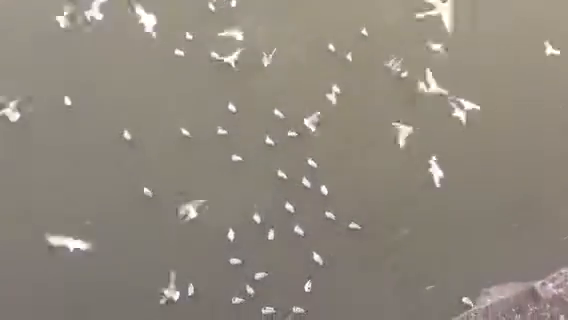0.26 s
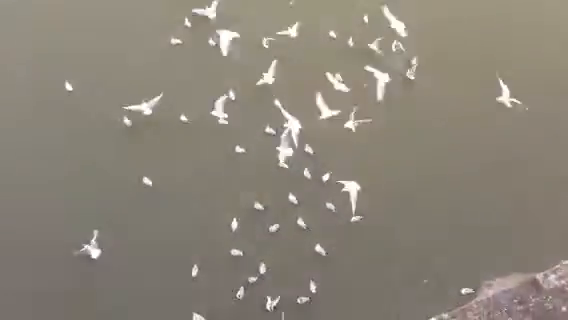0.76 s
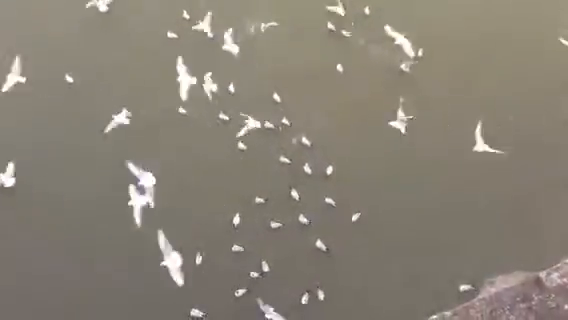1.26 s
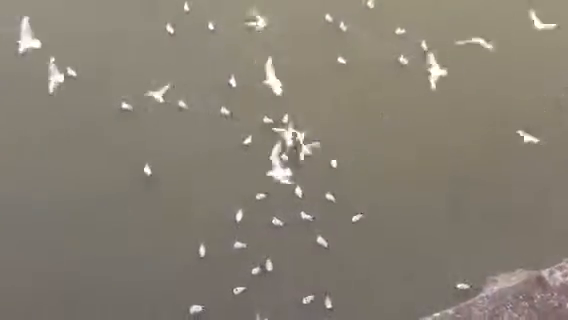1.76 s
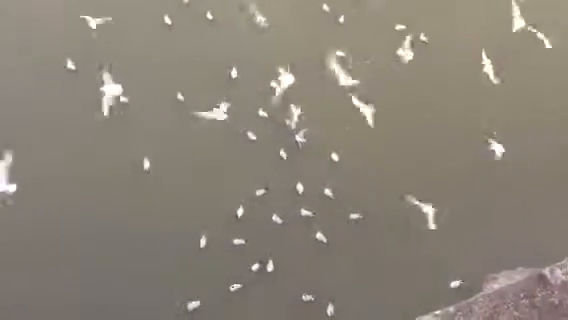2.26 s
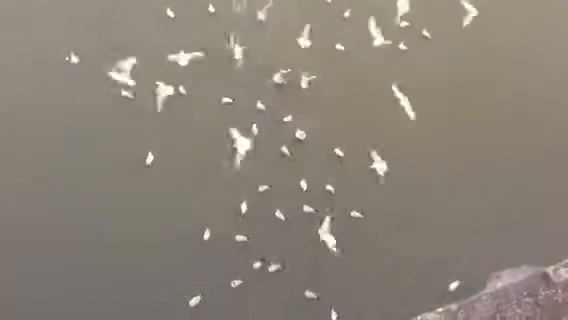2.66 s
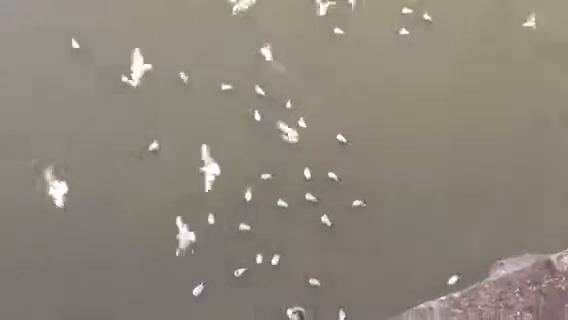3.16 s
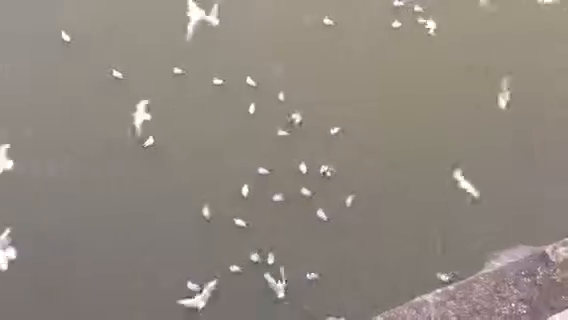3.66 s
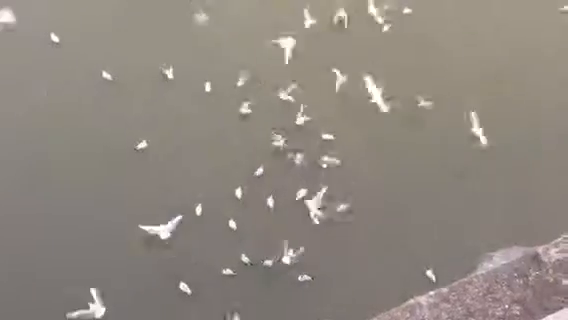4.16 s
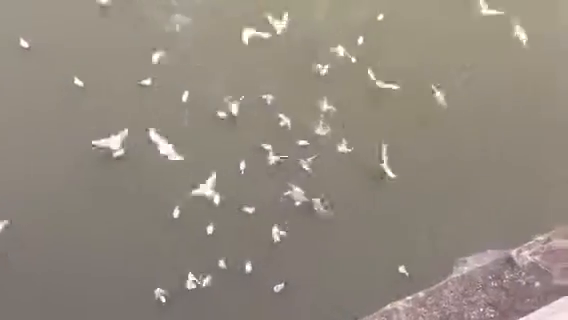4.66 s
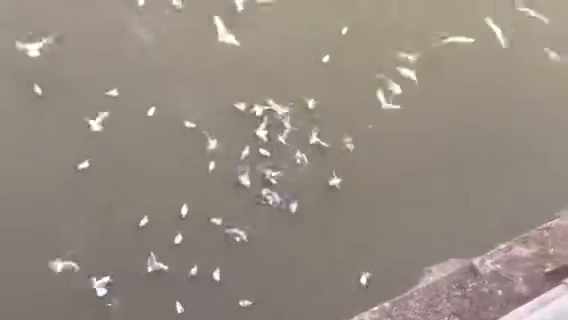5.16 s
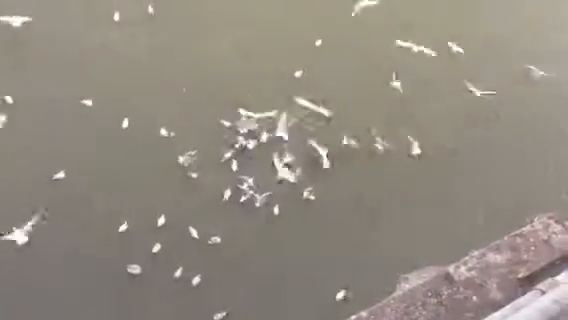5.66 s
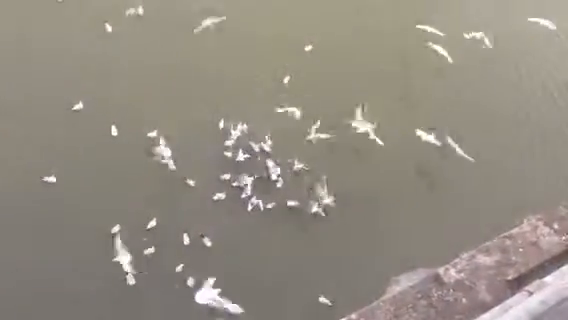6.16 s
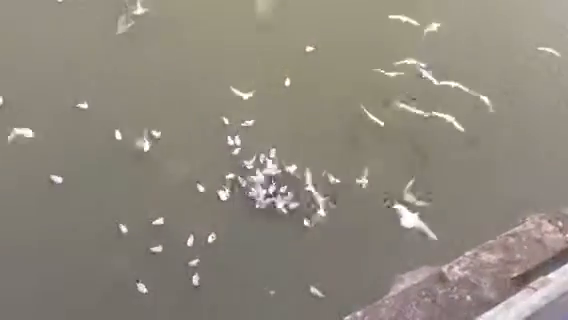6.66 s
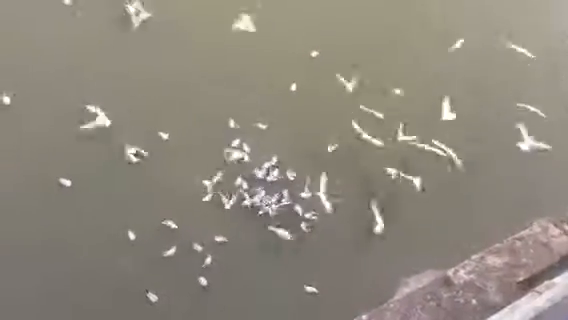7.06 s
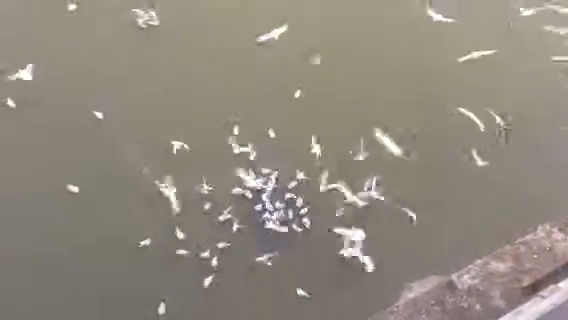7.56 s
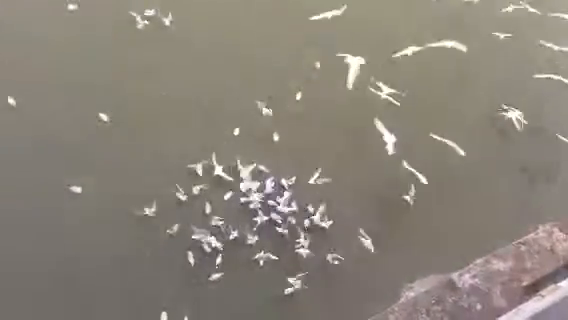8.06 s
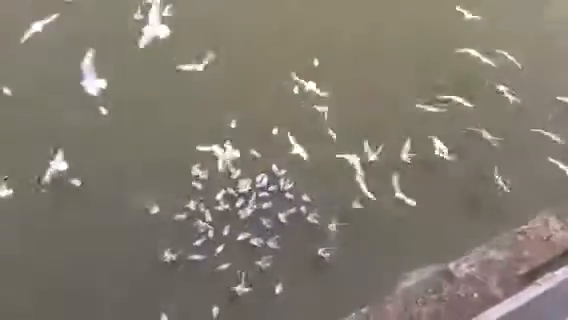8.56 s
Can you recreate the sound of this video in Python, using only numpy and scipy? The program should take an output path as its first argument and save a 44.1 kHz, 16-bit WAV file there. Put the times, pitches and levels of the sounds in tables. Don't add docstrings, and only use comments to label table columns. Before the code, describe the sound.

Outdoors above a river, a few quiet, short raspy gull calls and dry clacks sound over soft water hiss and low town rumble. After a thin, distant stretch, cries return near four seconds and multiply, near and far, into a dense squabbling clamour with hoarse longer calls and growing wing splash. A small microphone catches brief wind puffs and faint echoes off wall and banks.

```python
import sys
import numpy as np
from scipy import signal
from scipy.fft import rfft, irfft
from scipy.io import wavfile
from scipy.ndimage import uniform_filter1d

SR = 44100
rng = np.random.default_rng(int(sys.argv[2]) if len(sys.argv) > 2 else 0)


def log_audio(samples):
    frames = np.atleast_2d(samples).T
    limited = np.clip(frames, -1, 1)
    pcm = np.round(limited * 32767).astype(np.int16)
    wavfile.write(sys.argv[1], SR, pcm)


def invert_db(x):
    u = np.asarray(x, float) / 20
    return 10 ** u


N = 388080

# (fast pitch jitter/share, slow pitch wander/share, breath/0-1,
#                      half-pitch pulses/dB, pitch rise in each rattle beat/share)
CLEAR_VOICE = (.015, .016, .17, -12, .04)
HOARSE_VOICE = (.026, .04, .42, -7, .06)
SCREECH_VOICE = (.04, .03, .65, -6, .06)


def evened(x):
    return x / np.sqrt(np.mean(x ** 2) + 1e-20)


def add(mix, s, sound):
    part = mix[max(round(s * SR), 0):][:len(sound)]
    part += sound[:len(part)]


def read(points, hz, axis=1):
    columns = np.transpose(points)
    return np.interp(np.log(hz + 1), np.log(columns[0] + 1), columns[axis])


def cry(row, voice, glide, chance):
    # f/Hz, level/dB, share of the beak opening
    head = [(477, -29, 0), (1000, -18, 0), (1634, 3.5, 0.078), (2600, 2.5, 0.11), (3950, 2, 0.42),
            (5790, -2, 0.61), (7910, -12, 0.52), (11600, -21.5, 0.27), (15600, -28, 0)]
    rattle_hz, rattle_depth = 76.18, .68
    throat_width_hz, throat_db = 356, 6.5
    start, length, db, pitch_hz, throat_hz, beak_db = row
    jitter, wander, breath, half_db, sweep = voice
    progress = np.linspace(0, 1, min(int(length * SR), chance.shape[1]))
    wobble, drift, air = chance[:, :len(progress)]
    effort = np.clip(np.sin(np.pi * progress ** .8) * 1.3, 0, 1) ** 1.3
    gape = abs(np.sin(np.pi * progress ** .85)) ** 1.5

    def colour(hz, beak_db):
        throat = throat_db * np.exp(-.5 * ((hz - throat_hz) / throat_width_hz) ** 2)
        return invert_db(read(head, hz) + beak_db * read(head, hz, axis=2) + throat)

    rate = rattle_hz * (1 + .15 * air[0] + .3 * evened(uniform_filter1d(drift, size=500)))
    beat, rattle = np.divmod(np.cumsum(rate) / SR + air[1] % 1, 1)
    beat = beat.astype(int)

    slow = evened(uniform_filter1d(uniform_filter1d(wobble, size=900), size=600))
    arch = 0.0656 * min(0.0903 / length, 1) * (np.sin(np.pi * progress) - .8)
    bend = glide * (progress - .5) + arch + wander * slow + jitter * wobble[beat]
    quick = jitter * evened(uniform_filter1d(wobble, size=80))
    hz = pitch_hz * (1 + bend + sweep * (rattle - .5) + quick)

    orders = np.r_[1:17, 1.5:7][:, None]
    turns = 14 * length * progress[::32] * drift[:len(orders), None]
    swell_db = 6.05 * np.sin(2 * np.pi * (air[:len(orders), None] + turns))
    order_db = -1.5 * np.maximum(orders - 6, 0) + half_db * (orders % 1 > 0) - 7.2 * (orders == 1)
    strength = colour(orders * hz[::32], beak_db - 16 * (1 - gape[::32])) * invert_db(order_db + swell_db)
    strength = strength.repeat(32, axis=1)[:, :len(hz)]
    phase = 2 * np.pi * np.cumsum(hz) / SR + orders * air[2]
    tone = (strength * np.cos(orders * phase)).sum(0)

    bins_hz = np.fft.rfftfreq(len(hz), 1 / SR)
    shut = irfft(rfft(air) * colour(bins_hz, beak_db - 16), len(hz))
    wide = irfft(rfft(air) * colour(bins_hz, beak_db + 2.5), len(hz))
    hiss = shut + gape ** 2 * (wide - shut)

    chop = 1 - rattle_depth * np.cos(np.pi * rattle) ** 2
    chop *= uniform_filter1d(invert_db(0.4 * drift[beat]), size=100)
    voiced = np.sqrt(1 - breath) * evened(tone) + np.sqrt(breath) * effort * evened(hiss)
    return start, invert_db(db) * evened(chop * voiced) * effort


def near_gulls():
    # t/s, length/s, level/dB, pitch/Hz, beak opening as treble/dB
    deep_cries = [(.002, 0.3, -44.5, 1155, -19), (.082, 0.085, -37, 784, -20),
                  (.197, 0.042, -43.5, 742, -37), (.337, 0.16, -40, 916, -25),
                  (.47, 0.073, -48.5, 754, -21), (.681, 0.18, -47.5, 1065, -9), (.781, 0.07, -40, 840, -25),
                  (.935, 0.084, -46, 1323, -37), (1.399, 0.049, -42, 800, -21),
                  (2.831, 0.067, -45.5, 740, -33), (3.595, 0.06, -42, 839, -18),
                  (3.844, 0.043, -35, 1134, 14), (3.859, 0.085, -32, 1037, 13),
                  (5.226, 0.12, -36, 1038, -6), (5.415, 0.13, -32.5, 1062, -4),
                  (5.475, 0.13, -33, 959, -28), (5.685, 0.047, -28, 1043, 14),
                  (6.109, 0.062, -29.5, 1109, 6), (7.4, 0.14, -35, 938, 26), (7.81, 0.3, -33.5, 1110, 46)]
    low_cries = [(0.41, 0.078, -51, 983, -13), (1.712, 0.056, -36.5, 1000, -42),
                 (2.159, 0.055, -40.5, 894, -34), (2.283, 0.049, -49.5, 1032, -32),
                 (3.25, 0.056, -44, 1263, -40), (3.73, 0.056, -36, 1086, -7),
                 (4.058, 0.064, -33.5, 1278, -48), (4.422, 0.13, -34, 1240, -31),
                 (4.692, 0.063, -33, 1263, 6), (4.742, 0.062, -37, 1076, -9),
                 (5.055, 0.0434, -37.5, 903, -19), (5.934, 0.043, -31, 1102, -9),
                 (5.999, 0.086, -31.5, 1209, 11), (6.927, 0.24, -33, 736, 0), (7.111, 0.12, -35, 756, 16),
                 (7.645, 0.074, -31, 990, -14)]
    middle_cries = [(0.329, 0.039, -42.5, 740, -13), (1.855, 0.042, -49, 1250, -28),
                    (0.965, 0.07, -54, 793, -18), (4.359, 0.1, -33, 890, -24),
                    (4.578, 0.26, -39.5, 842, -15), (4.822, 0.19, -33, 897, -24),
                    (4.972, 0.028, -30.5, 947, -34), (5.12, 0.21, -41.5, 918, -23),
                    (5.585, 0.23, -31.5, 924, -2), (6.268, 0.17, -29.5, 1167, 0),
                    (6.468, 0.25, -36, 893, 5), (6.767, 0.22, -33, 928, 8), (7.197, 0.21, -33, 859, 1),
                    (7.55, 0.15, -37.5, 935, -3), (7.715, 0.16, -31.5, 1002, -3),
                    (8.104, 0.21, -30.5, 957, -8), (8.244, 0.2, -31, 918, -9),
                    (8.413, 0.19, -29.5, 940, -3), (8.682, 0.18, -30, 892, 8)]
    nasal_cries = [(1.766, 0.03, -46, 860, -20), (0.914, 0.069, -50, 890, -19),
                   (1.11, 0.094, -40.5, 785, -26), (1.266, 0.049, -49, 896, -13),
                   (1.79, 0.059, -37, 919, -7), (3.849, 0.11, -34.5, 963, -1),
                   (4.003, 0.045, -34, 889, -22), (5.135, 0.046, -34, 924, -33),
                   (5.206, 0.056, -35, 902, -5), (5.355, 0.038, -34.5, 876, -26),
                   (5.645, 0.035, -38, 807, -18), (6.255, 0.14, -27.5, 1053, 13), (7.31, 0.17, -31, 968, 6),
                   (7.815, 0.14, -33.5, 916, -11), (8.1, 0.061, -29, 1096, -5),
                   (8.53, 0.074, -29.5, 905, -11)]
    sharp_cries = [(.352, 0.051, -38.5, 841, -7), (0.555, 0.078, -43, 958, -15),
                   (4.594, 0.051, -42.5, 868, -25), (0.767, 0.043, -39, 1125, -6),
                   (3.513, 0.057, -38, 1240, 11), (4.202, 0.09, -36, 1180, -20),
                   (5.844, 0.14, -31, 1084, 8), (5.899, 0.075, -28.5, 981, -11),
                   (6.069, 0.068, -28.5, 940, -17), (6.096, 0.052, -24, 1156, -9),
                   (6.941, 0.044, -38, 1013, 16), (7.831, 0.036, -33, 1090, -10),
                   (8.039, 0.12, -27, 937, -5), (8.034, 0.067, -29, 1065, -2), (8.198, 0.12, -31, 1072, 24),
                   (8.7, 0.047, -39, 1180, 9)]
    shrill_cries = [(1.369, 0.077, -35, 980, -63), (1.378, 0.042, -40.5, 1012, 2),
                    (3.649, 0.17, -40, 1018, -22), (4.279, 0.047, -34, 1034, -12),
                    (4.42, 0.06, -31.5, 1000, -3), (4.683, 0.066, -31, 1018, -3),
                    (4.8, 0.17, -35, 1308, -7), (4.941, 0.054, -34.5, 742, -22),
                    (5.365, 0.23, -38.5, 973, -7), (5.569, 0.075, -33.5, 870, 22),
                    (5.724, 0.28, -39, 955, 12), (6.045, 0.14, -32.5, 1030, 12),
                    (6.162, 0.062, -32.5, 1148, 7), (6.628, 0.28, -39.5, 936, 3),
                    (7.05, 0.055, -32.5, 1120, 21), (7.182, 0.11, -32, 1000, -21),
                    (7.331, 0.079, -36, 1050, 14), (7.459, 0.15, -34.5, 1077, 19),
                    (7.959, 0.11, -34, 1000, 7), (8.373, 0.15, -32.5, 1100, 3)]
    piercing_cries = [(.546, 0.27, -46.5, 783, -30), (1.136, 0.21, -51.5, 745, -58),
                      (3.44, 0.074, -39, 912, -34), (3.515, 0.073, -50, 1085, -13),
                      (3.675, 0.047, -33.5, 1047, 4), (4.13, 0.12, -30, 1093, -1),
                      (4.2, 0.12, -30, 1069, 9), (6.523, 0.042, -29.5, 1090, 3),
                      (7.291, 0.14, -30.5, 964, 22), (7.842, 0.14, -34, 1125, -30),
                      (8.61, 0.17, -33.5, 932, -14)]
    screeches = [
        (1.682, 0.1, -42, 896, 12),
        (1.859, 0.12, -54.5, 846, -7),
        (3.238, 0.084, -40, 1140, -21),
        (3.425, 0.17, -34.5, 1174, 11),
        (6.711, 0.12, -27, 1095, 8.5),
    ]
    throats_hz = 1590, 2040, 2470, 2720, 3170, 4050, 5560
    sag = -0.03556
    out = np.zeros(N)
    sizes = (deep_cries, low_cries, middle_cries, nasal_cries, sharp_cries, shrill_cries, piercing_cries)
    for rows, throat_hz in zip(sizes, throats_hz):
        chances = rng.standard_normal((len(rows), 3, 10000))
        for (s, length, db, hz, beak_db), chance in zip(rows, chances):
            voice = [np.interp(length, (.125, .19), pair) for pair in zip(CLEAR_VOICE, HOARSE_VOICE)]
            add(out, *cry((s, length, db, hz, throat_hz, beak_db), voice, sag, chance))
    chances = rng.standard_normal((len(screeches), 3, 10000))
    for (s, length, db, hz, beak_db), chance in zip(screeches, chances):
        add(out, *cry((s, length, db, hz, 2700, beak_db), SCREECH_VOICE, sag, chance))
    return out


def yaps():
    # t/s, length/s, level/dB, pitch/Hz, loudest f/Hz
    bright_yaps = [(.348, 0.03, -47, 900, 3500), (.644, 0.012, -41, 867, 2600),
                   (.661, 0.026, -41, 765, 2350), (.696, 0.024, -45.5, 797, 3200),
                   (.929, .018, -41, 874, 2650), (.948, 0.021, -42.5, 780, 2660),
                   (1.158, 0.023, -43.5, 782, 3100), (1.272, 0.028, -48, 895, 2700),
                   (4.698, 0.014, -52, 1030, 4140), (4.716, 0.014, -35, 1314, 2600),
                   (6.602, 0.014, -54, 1110, 4500), (6.618, 0.019, -39, 1123, 4500),
                   (6.822, .014, -37, 1110, 4450), (6.838, .014, -39, 1120, 4450),
                   (4.744, .015, -43, 1000, 4050), (4.817, 0.014, -35.5, 1000, 4000),
                   (4.834, 0.0154, -36, 1000, 4000), (4.862, 0.037, -37, 967, 3880),
                   (4.553, 0.018, -40, 854, 2550), (5.478, 0.032, -39, 1100, 5480),
                   (8.378, 0.029, -38, 1107, 4440), (8.044, .026, -30.5, 1140, 3420),
                   (3.68, 0.014, -36.5, 1076, 4280), (3.695, 0.016, -32.5, 1080, 4300),
                   (5.697, 0.0099, -30, 1066, 5380), (5.716, 0.012, -38, 1060, 5350)]
    mellow_yaps = [(2.555, 0.03, -47.5, 639, 1330), (4.477, 0.014, -45, 1300, 2520),
                   (4.493, 0.013, -31.5, 1258, 2520), (4.76, 0.02, -30.5, 1137, 2220),
                   (4.777, 0.011, -34, 1110, 2210), (4.794, 0.012, -32, 1070, 2120),
                   (4.905, 0.022, -32, 904, 2680), (5.066, 0.015, -36.5, 937, 1870),
                   (5.135, 0.014, -37, 925, 2800), (5.152, 0.012, -40, 920, 2760),
                   (5.168, 0.018, -38, 910, 2750), (5.232, 0.019, -34, 914, 1820),
                   (5.36, .014, -35, 880, 2670), (5.374, .016, -40, 890, 2660),
                   (5.535, 0.034, -37, 916, 1920), (7.214, 0.03, -31, 1000, 4000),
                   (7.41, 0.05, -38, 927, 1900), (7.49, 0.034, -34.5, 934, 2800),
                   (7.572, 0.04, -37.5, 997, 2020), (7.655, 0.044, -37, 979, 3920),
                   (7.672, 0.036, -40, 1000, 2020), (4.53, 0.016, -47, 830, 1660),
                   (4.598, 0.015, -39, 870, 2580), (4.945, 0.032, -34, 931, 2790),
                   (5.495, 0.02, -34, 974, 2910), (8.066, 0.033, -31.5, 953, 2850),
                   (7.835, .025, -37, 1116, 3330), (8.545, .022, -33, 1306, 2600)]
    held_yaps = [(7.31, .135, -30.5, 965, 2800), (7.465, .15, -35, 1062, 5700), (5.7, .12, -40, 850, 5620),
                 (7, 0.13, -41.5, 1040, 4600), (9.9, 0.045, -37, 1200, 3200), (8.59, 0.053, -40, 910, 2200),
                 (1.2, 0.049, -47, 740, 2800), (.8, .057, -50.5, 850, 2100), (.42, 0.05, -43.5, 1000, 1870),
                 (6.275, 0.0835, -31.5, 1190, 2700), (5.945, 0.034, -37, 1200, 2240),
                 (6.082, .022, -30, 1300, 2600), (6.1, 0.0504, -30.5, 1110, 1800),
                 (5.91, .03, -34.5, 880, 3600), (7.335, 0.082, -37.5, 985, 1800),
                 (6.6, 0.057, -34, 980, 2600), (4.155, .048, -35.5, 1100, 1600),
                 (4.215, 0.066, -36, 1110, 2000), (6.965, .04, -36, 1030, 1600)]
    arch, sag, jitter = 0.029, -0.0305, .007
    rattle_hz, rattle_depth, breath_share = 62, .8, .38
    out, orders = np.zeros(N), np.arange(1, 17)[:, None]
    for rows, slope_db in ((bright_yaps, -17.5), (mellow_yaps, -23.5), (held_yaps, -25)):
        chances = rng.standard_normal((len(rows), len(orders), 7000))
        for (s, length, db, pitch_hz, top_hz), chance in zip(rows, chances):
            progress = np.linspace(0, 1, min(int(length * SR), chance.shape[1]))
            shake = jitter * evened(uniform_filter1d(chance[0], size=120))[:len(progress)]
            hz = pitch_hz * (1 + arch * (np.sin(np.pi * progress) - .7) + sag * (progress - .5) + shake)

            octaves = np.log2(orders * pitch_hz / top_hz)
            throat_db = np.where(octaves > 0, slope_db * abs(octaves) ** 0.52, 19 * octaves)
            air_db = -14 * np.maximum(np.log2(orders * pitch_hz / 7300), 0)
            uneven_db = 4.3 * chance[:, :1] * (abs(octaves) > .1)
            strength = invert_db(throat_db - 24 * (orders == 1) + air_db + uneven_db)

            breath = 1 + breath_share * 6 * uniform_filter1d(chance, size=40, axis=1)[:, :len(hz)]
            phase = orders * 2 * np.pi * np.cumsum(hz) / SR + 3 * chance[:, 1:2]
            tone = (strength * breath * np.cos(phase)).sum(0)
            beats = max(round(length * rattle_hz), 1)
            chop = 1 - rattle_depth * (beats > 1) * np.cos(np.pi * beats * progress) ** 4
            fade = signal.windows.tukey(len(hz), min(0.02 / length, .9))
            add(out, s, invert_db(db + 3.5) * evened(tone * chop) * fade)
    return out


def mews():
    # t/s, length/s, level/dB, first pitch/Hz, last pitch/Hz
    whistles = [(1.95, 0.18, -56, 1980, 1840), (1.93, 0.047, -51.5, 1260, 1500),
                (1.6, 0.094, -60, 1500, 1300), (2.665, .275, -50.5, 1960, 1900),
                (3.3, 0.122, -59, 2200, 1900), (1.675, 0.043, -49.5, 1550, 1700),
                (.868, .045, -67, 3800, 3900), (2.095, .03, -65, 4500, 3880), (3.4, 0.042, -52, 1300, 1200),
                (2.275, 0.051, -60, 3600, 4800), (2.92, 0.37, -58, 1700, 1420),
                (7.965, 0.135, -40, 4400, 2650)]
    out = np.zeros(N)
    for s, length, db, from_hz, to_hz in whistles:
        t = np.arange(0, length, 1 / SR)
        arch = 1 + 0.022 * np.sin(np.pi * np.sqrt(t / length))
        hz = (from_hz + (to_hz - from_hz) * t / length) * arch
        flutter = 1 + 0.03 * evened(uniform_filter1d(rng.standard_normal(SR)[:len(t)], 150))
        rattle = 1 + 0.67 * np.sin(2 * np.pi * 75 * t)
        tone = np.sin(2 * np.pi * np.cumsum(hz * flutter) / SR) * rattle
        add(out, s, invert_db(db) * evened(tone) * signal.windows.tukey(len(t), .3))
    return out


def clacks_and_bubbles():
    # t/s, peak level/dB, centre f/Hz
    clacks = [(.013, -35, 6000), (.189, -21.5, 5860), (.268, -53, 5500), (0.524, -32, 6500),
              (1.0654, -48, 5950), (1.2533, -31, 4800), (1.482, -36, 2180), (1.554, -37, 6000),
              (2.3726, -34, 1600), (2.628, -37, 2500), (2.668, -24, 2600), (3.818, -29, 7100),
              (3.96, -38, 5000), (4.0826, -16, 2600), (4.351, -36, 5000), (.31, -39, 5540),
              (.575, -49, 7000), (1.108, -33, 6000), (1.13, -25, 8000), (1.225, -46, 6000),
              (1.917, -44, 3000), (2.317, -43, 3200), (2.508, -52, 4000), (3.06, -40, 5000)]
    # t/s, level/dB, start f/Hz, end f/Hz, length/s
    bubbles = [
        (2.022, -60, 850, 1200, .022),
        (3.008, -53, 650, 1250, .032),
    ]
    out, t = np.zeros(N), np.arange(300) / SR
    for (s, db, hz), snap in zip(clacks, rng.standard_normal((len(clacks), 300))):
        ring = np.sin(2 * np.pi * hz * t) * np.exp(-t * hz / 0.33)
        ring = 0.49 * np.gradient(ring) * SR / (2 * np.pi * hz)
        ring = uniform_filter1d(ring, size=3)
        echo = np.convolve(ring, snap * np.exp(-t / 0.0016))
        add(out, s, invert_db(db) * (np.pad(ring, (0, 299)) + 0.76 * echo))
    for s, db, from_hz, to_hz, length in bubbles:
        hz = np.linspace(from_hz, to_hz, int(length * SR))
        tone = np.sin(2 * np.pi * np.cumsum(hz) / SR)
        add(out, s, invert_db(db + 1) * tone * np.hanning(len(hz)))
    return out


def hush_db(t):
    # t/s, change/dB, half length/s
    lulls = [
        (0.877, -17, 0.14),
        (1.6, 3, 0.14),
        (3.94, -12, 0.13),
        (4.347, -21, 0.053),
        (5.023, -23, 0.038),
        (6.248, -14, 0.12),
        (7.11, -12, 0.049),
        (7.709, -10.5, 0.12),
    ]
    return sum(db * np.maximum(1 - abs(t - s) / half, 0) for s, db, half in lulls)


def far_flock(count=100):
    # t/s, level/dB
    clamour = [(0, -36), (.3, -61), (1.2, -41), (2, -82), (2.6, -60), (3.35, -51), (3.7, -42), (4.1, -31.5),
               (4.5, -33.5), (4.8, -25), (4.97, -29), (5.5, -35.5), (6.3, -21), (6.6, -27), (7.3, -26),
               (7.7, -20.5), (8.4, -27.5), (8.8, -19)]
    out = np.zeros(N)
    for k, (when, long, loud, high, throat) in enumerate(rng.random((count, 5))):
        start = (k + when - 1) * N / SR / (count - 1)
        row = (start, .09 + .12 * long, 5 * loud, 800 + 380 * high, 1600 + 1200 * throat, -13)
        add(out, *cry(row, HOARSE_VOICE, -0.0636, rng.standard_normal((3, 10000))))
    t = np.arange(N) / SR
    return evened(out) * invert_db(np.interp(t, *np.transpose(clamour)) + hush_db(t) - 9.5)


def water(stir_db):
    # f/Hz, level/dB
    rumble_tint = [(25, -34), (80, -24), (100, -15.5), (144, 0.5), (200, -3), (250, -7), (400, -12),
                   (600, -20), (1500, -86)]
    # f/Hz, level/dB
    wash_tint = [(150, -16), (300, 2.5), (630, 0.5), (1000, 1.5), (1600, 3.5), (3200, -11), (6300, -15),
                 (10000, -17.5), (15000, -25)]
    # t/s, spray level/dB
    wings = [
        (0, -70.5),
        (.7, -67.5),
        (1.7, -74.5),
        (3.2, -73.5),
        (4.4, -63.5),
        (5.9, -62),
        (7.2, -59.5),
        (8.8, -54),
    ]
    frames, hz = N // 128 + 5, np.fft.rfftfreq(512, 1 / SR)[:, None]
    a, b, patches = rng.standard_normal((frames, 257, 3)).T
    patches = 2.4 * evened(uniform_filter1d(uniform_filter1d(patches, 8, 0), 20, 1))
    at = np.arange(frames) * 128
    spray_db = np.interp(at / SR, *np.transpose(wings))
    splash_db = -61 + 0.66 * (spray_db - spray_db.mean())
    high = np.clip(np.log(hz / 1200 + 1e-9) / np.log(6), 0, 1)
    drops_db = 1.3 * high * rng.exponential(1, frames)
    thrash_db = .43 * np.interp(at, np.arange(N), stir_db)
    treble_db = high * (spray_db - splash_db + 11 + thrash_db)
    z = (a + 1j * b) * invert_db(read(wash_tint, hz) + patches + drops_db + splash_db + treble_db)
    wash = invert_db(42.0) * signal.istft(z, nperseg=512, noverlap=384)[1][:N] / 256
    tint = invert_db(read(rumble_tint, np.fft.rfftfreq(N, 1 / SR)))
    rumble = irfft(rfft(rng.standard_normal(N)) * tint, N)
    return wash + evened(rumble) * invert_db(-53.5)


def puffs():
    # t/s, level/dB, length/s
    gusts = [
        (0.587, -48.5, 0.1),
        (4.517, -47, 0.091),
        (7.122, -43.5, 0.076),
    ]
    out, band = np.zeros(N), signal.butter(2, [170, 520], "band", fs=SR, output="sos")
    for (s, db, length), air in zip(gusts, rng.standard_normal((len(gusts), SR // 4))):
        n = int(length * SR)
        add(out, s, invert_db(db) * evened(signal.sosfilt(band, air))[:n] * np.hanning(n))
    return out


def banks(x):
    t = np.arange(SR // 3) / SR
    sparse = rng.standard_normal(len(t)) * (rng.random(len(t)) < .05)
    fade = invert_db(-60 * t / 0.077) + invert_db(-18 - 60 * t / 0.26)
    tail = uniform_filter1d(sparse * fade * (t > .004), 4)
    return signal.oaconvolve(x, tail / np.linalg.norm(tail))[:N]


def scene():
    near = near_gulls() + yaps()
    birds = near + mews() + clacks_and_bubbles()
    flock = far_flock()
    no_bass = signal.butter(2, 300, "high", fs=SR, output="sos")
    birds, flock = signal.sosfilt(no_bass, [birds, flock])
    loud = uniform_filter1d(near ** 2, size=1500) + invert_db(-86)
    stir_db = 10 * np.log10(abs(loud / uniform_filter1d(loud, size=SR)))
    echoes = invert_db(-15.5) * banks(birds + 0.5 * flock)
    return (birds + echoes + flock + water(stir_db) + puffs())[None]


def band_limit(x):
    return signal.sosfilt(signal.butter(12, 15170, fs=SR, output="sos"), x)


def record(dry):
    overload = 0.37
    thin = signal.sosfilt(signal.butter(1, 30, "high", fs=SR, output="sos"), dry)
    rounded = overload * np.tanh(thin / overload)
    edge = signal.firwin(255, 15450, window=("kaiser", 8), fs=SR)[None]
    return band_limit(signal.oaconvolve(rounded, edge, "same"))


dry = scene()
out = record(dry)
log_audio(out)
```